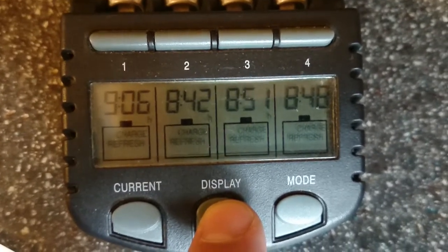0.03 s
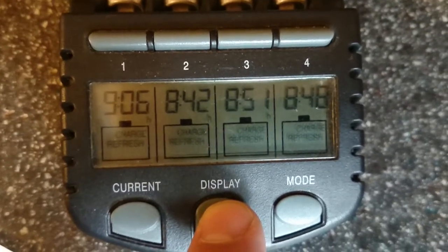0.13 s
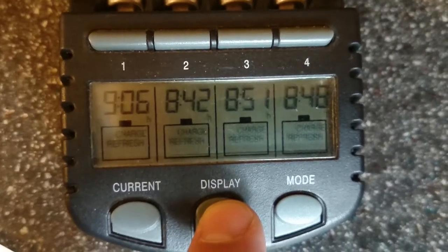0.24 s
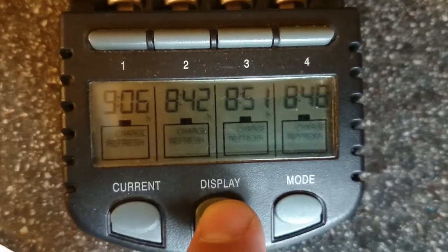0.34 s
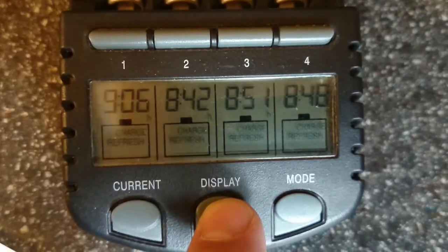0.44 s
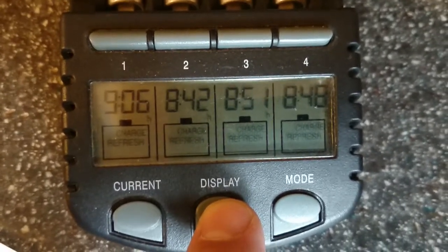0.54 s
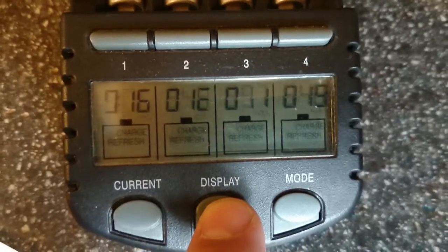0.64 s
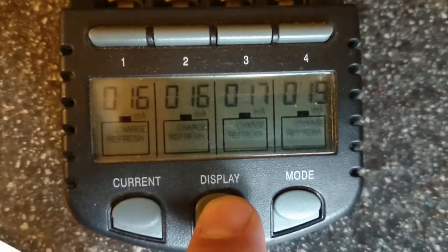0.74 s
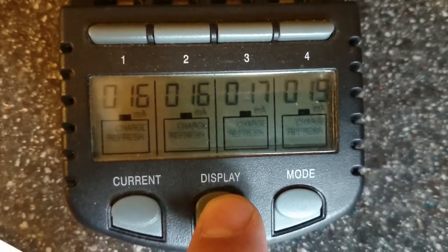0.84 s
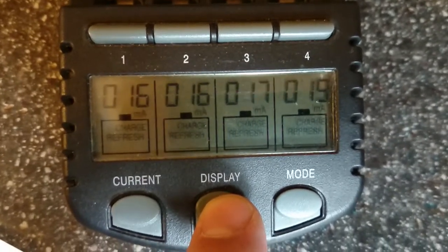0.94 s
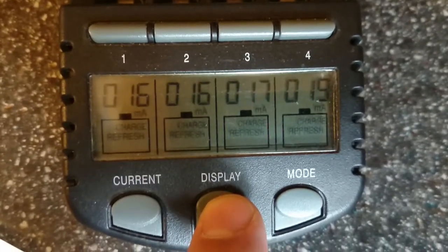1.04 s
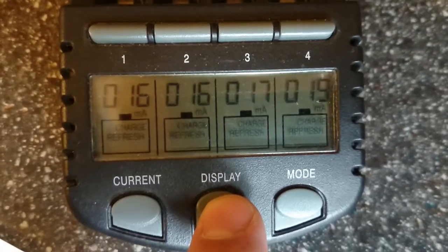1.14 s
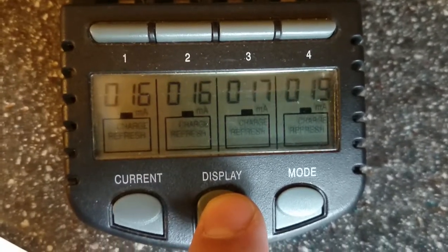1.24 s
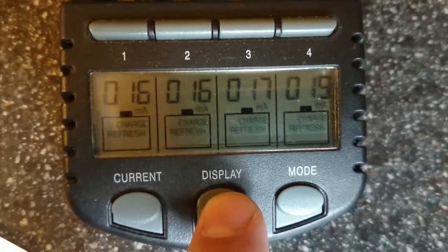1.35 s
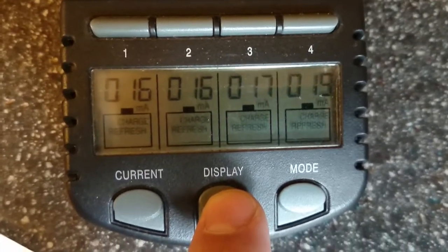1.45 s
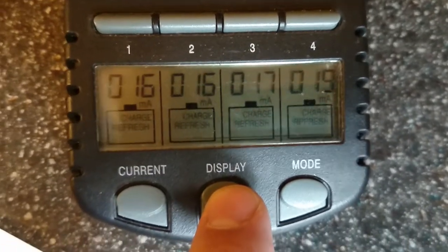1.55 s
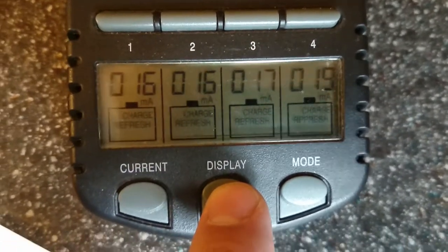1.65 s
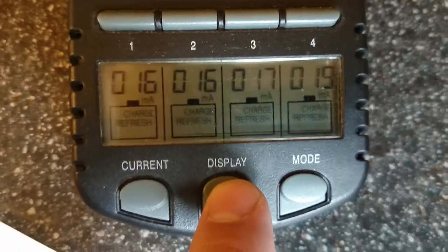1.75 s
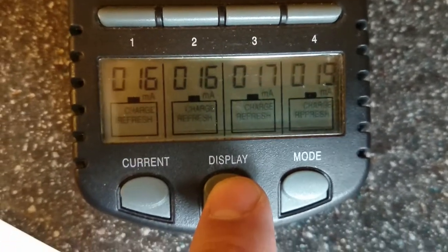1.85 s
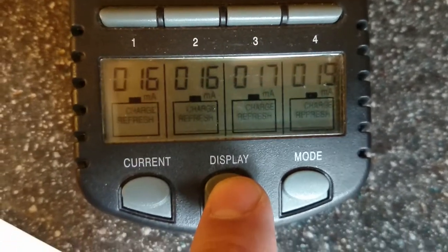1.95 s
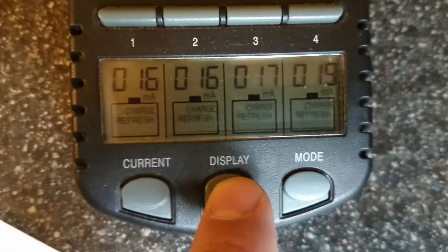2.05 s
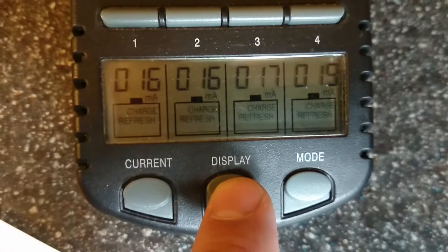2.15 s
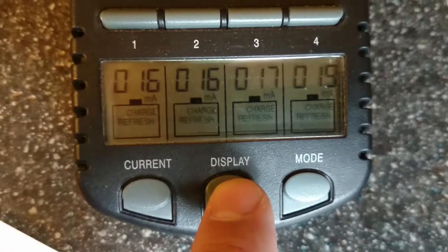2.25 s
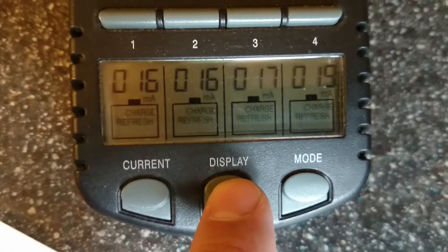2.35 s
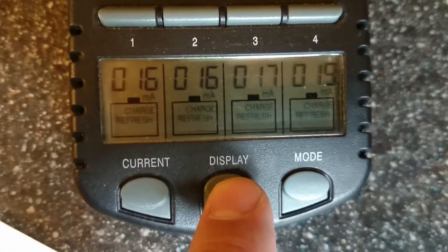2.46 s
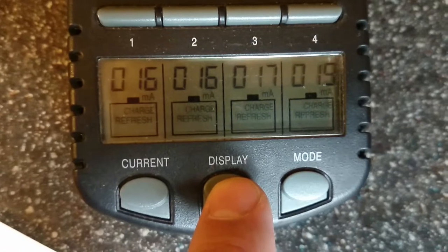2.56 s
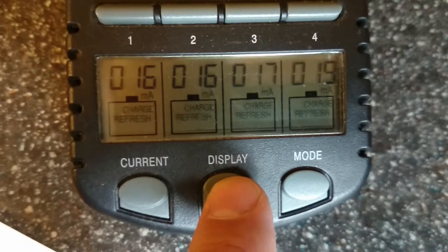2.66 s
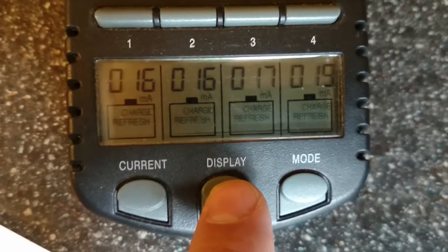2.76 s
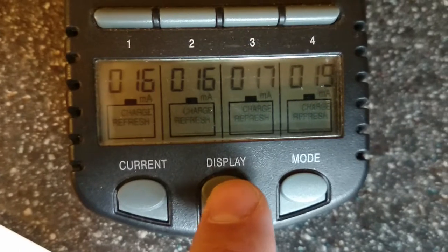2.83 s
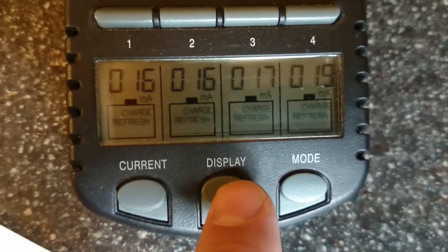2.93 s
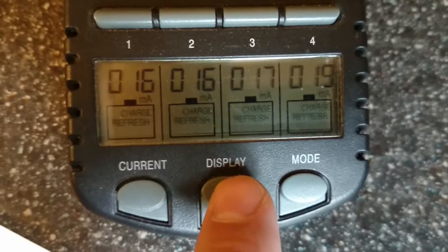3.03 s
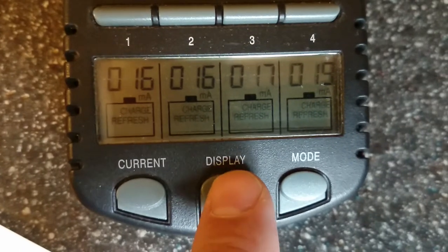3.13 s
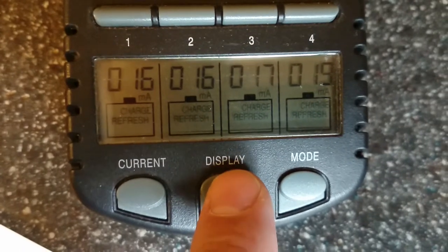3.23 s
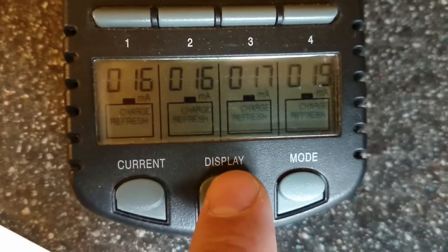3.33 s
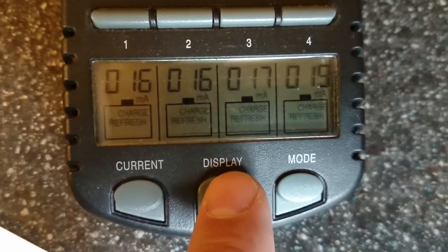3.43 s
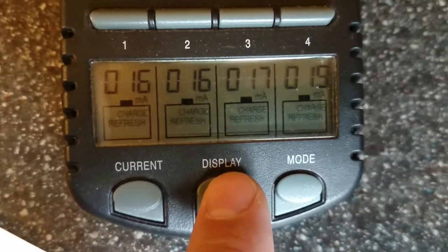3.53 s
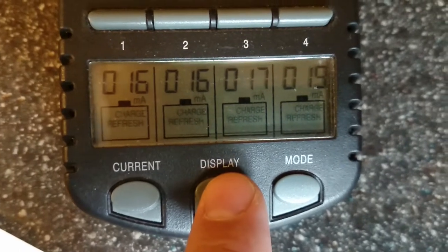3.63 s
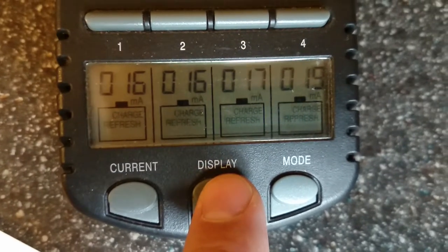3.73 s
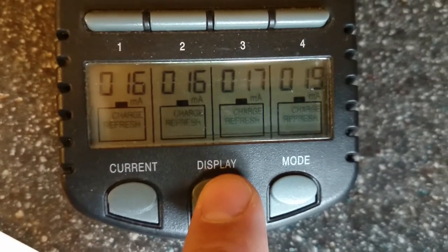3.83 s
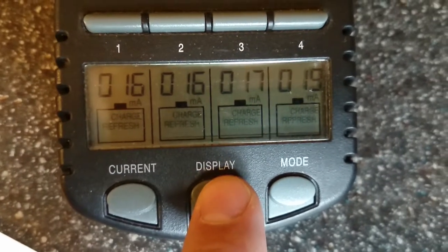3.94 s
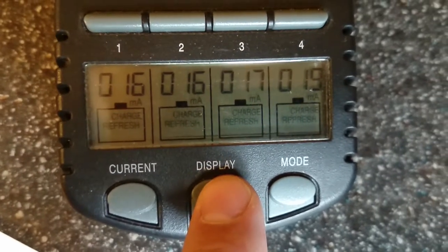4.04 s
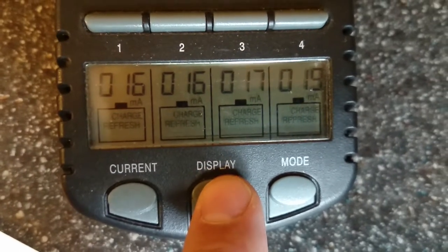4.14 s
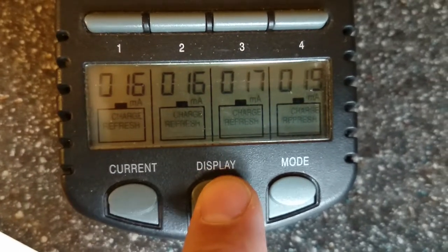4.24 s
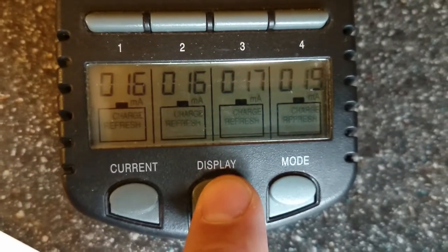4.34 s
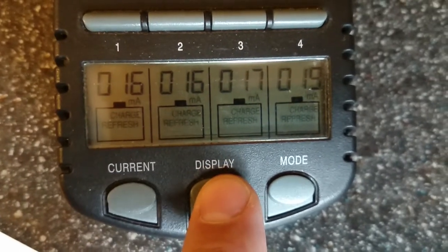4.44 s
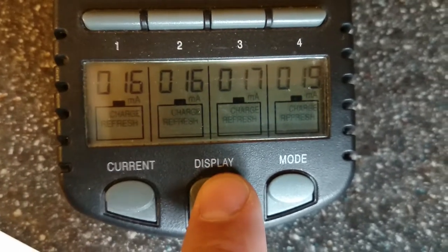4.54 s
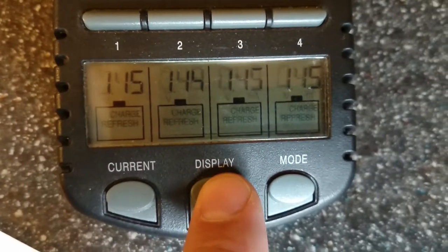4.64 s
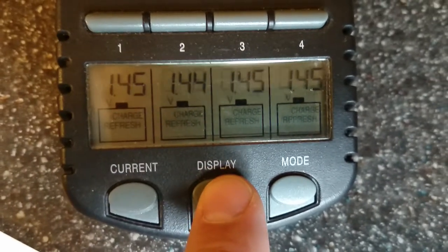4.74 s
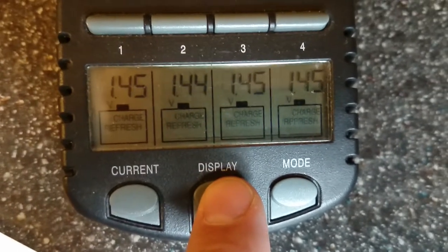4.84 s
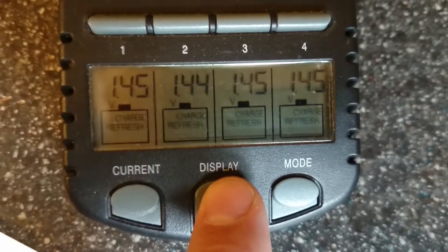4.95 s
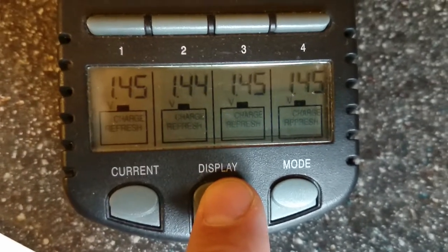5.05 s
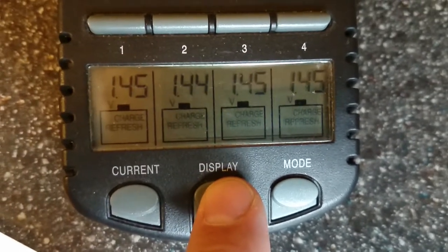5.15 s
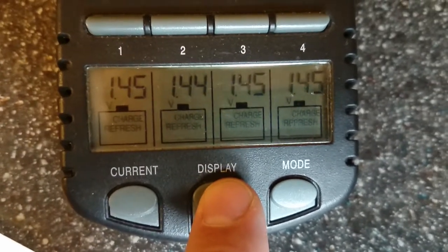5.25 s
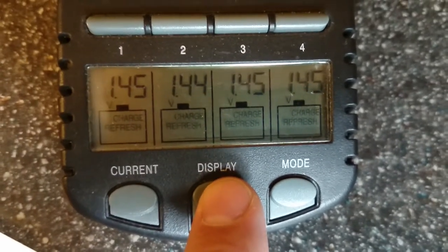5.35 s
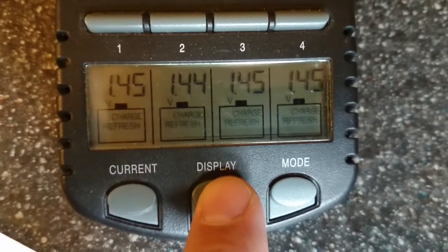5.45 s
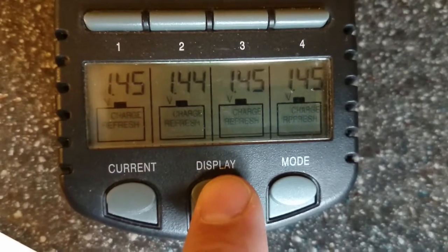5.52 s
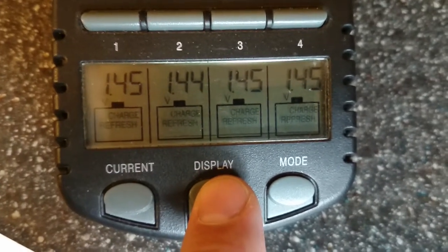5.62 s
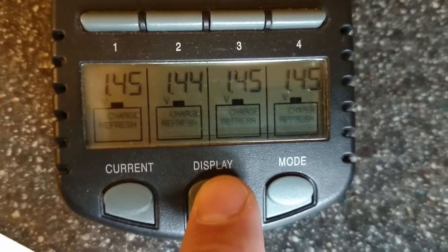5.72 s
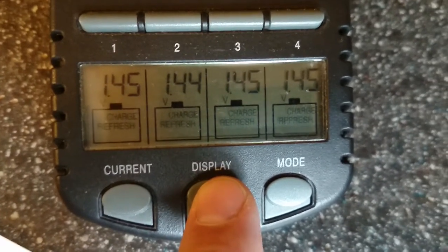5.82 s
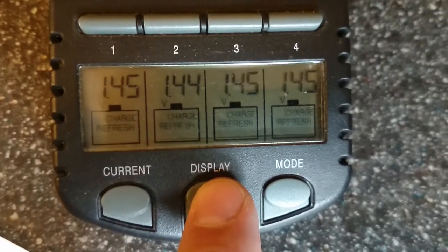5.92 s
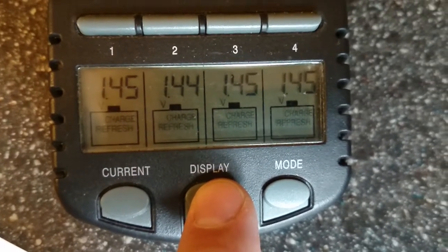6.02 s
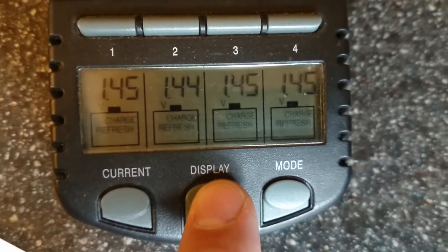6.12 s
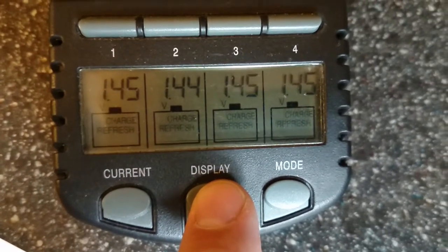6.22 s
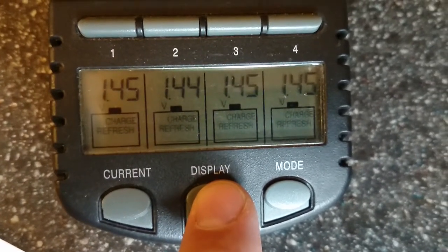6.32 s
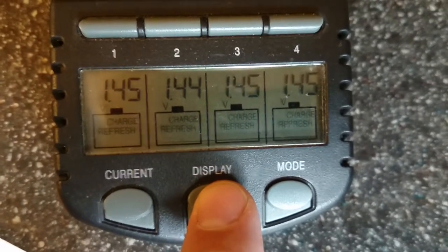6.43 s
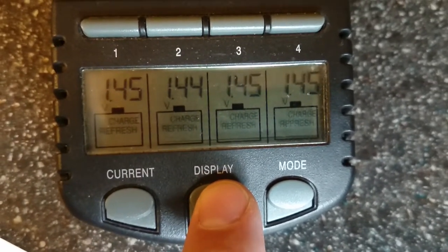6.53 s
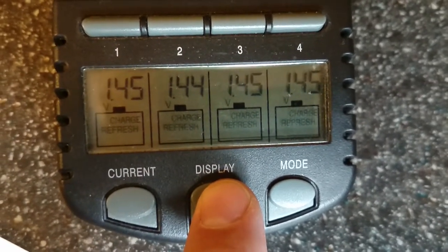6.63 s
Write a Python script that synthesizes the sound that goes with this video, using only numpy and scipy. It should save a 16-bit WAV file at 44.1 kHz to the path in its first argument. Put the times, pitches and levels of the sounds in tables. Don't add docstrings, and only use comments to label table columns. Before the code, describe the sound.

Close to a microphone in a small room, a plastic button on a device on a hard table is pressed and released with two sharp, chattering clicks, then faint finger shifts follow. Later a second press and release snap. Soft hiss and faint regular electric ticking run beneath, while a low draught rumbles and pops in the right channel only.

```python
import sys
import numpy as np
from scipy import signal
from scipy.fft import rfft, irfft
from scipy.io import wavfile
from scipy.ndimage import uniform_filter1d

SR = 44100
rng = np.random.default_rng(int(sys.argv[2]) if len(sys.argv) > 2 else 0)


def inscribe(sig):
    pcm = np.round(np.clip(np.atleast_2d(sig).T, -1, 1) * 32767)
    wavfile.write(sys.argv[1], SR, pcm.astype(np.int16))


def level_to_linear(level):
    exponent = np.asarray(level, float) / 20
    return 10 ** exponent


N = 294567
RIGHT_LATE_S = 0.00027


def read(points, hz):
    f, value = np.transpose(points)
    return np.interp(np.log(hz + 1), np.log(f + 1), value)


def evened(x):
    return x / np.sqrt(np.mean(x ** 2) + 1e-20)


def add(mix, s, sound):
    part = mix[:, round(s * SR):][:, :sound.shape[1]]
    part += sound[:, :part.shape[1]]


def coloured(points):
    hz = np.fft.rfftfreq(N, 1 / SR)
    white = rfft(rng.standard_normal(N))
    return irfft(white * level_to_linear(read(points, hz)) * np.sqrt(SR / 2), N)


def ring(mode, rise_s=0.00023):
    hz, left_db, right_db, t60 = mode
    t = np.maximum(np.arange(SR // 5) / SR - np.array([[0], [RIGHT_LATE_S]]), 0)
    fading = level_to_linear(np.array([[left_db], [right_db]]) - 60 * t / t60)
    return fading * np.sin(2 * np.pi * hz * t) * (1 - np.exp(-t / rise_s))


def thinned(hiss):
    line_db, patch_db, from_hz, lift_db = -3, -4.5, 2500, 0.98
    hz, _, z = signal.stft(hiss, SR, nperseg=2048)
    power = abs(z) ** 2
    around = uniform_filter1d(power.mean(2, keepdims=True), size=41, axis=1)
    strong_line = power > level_to_linear(2 * line_db) * around
    strong_patch = uniform_filter1d(power, size=9, axis=1) > level_to_linear(2 * patch_db) * around
    gain = np.where(hz[:, None] > from_hz, level_to_linear(lift_db) * (strong_line & strong_patch), 1)
    return signal.istft(z * gain, SR, nperseg=2048)[1][:, :N]


# [f/Hz, level/dB per Hz]
LEFT_HISS = [(15, -87), (60, -86.5), (100, -90.5), (300, -96.5), (800, -105), (1500, -111), (4500, -116),
             (6500, -117), (7900, -107), (9700, -118), (10500, -114), (12000, -119), (14000, -122),
             (15600, -120)]
RIGHT_HISS = [(15, -82.5), (100, -85.5), (400, -99), (800, -105), (1500, -109), (3000, -110), (4500, -113),
              (5650, -107), (6600, -115), (8000, -118), (11000, -120), (16000, -120)]


def port_hiss():
    return thinned(np.array([coloured(LEFT_HISS), coloured(RIGHT_HISS)]))


# [f/Hz, left level/dB, right level/dB]
HUM = [(792.5, -97, -88.5), (6600, -100, -99), (7130, -99, -99), (5900, -103, -87), (5730, -103, -103),
       (5300, -103, -114)]
# [first tick t/s, number of ticks]
TICK_RUNS = [
    (.2061, 25),
    (.7080, 1),
    (.7419, 23),
]
# [f/Hz, left level/dB, right level/dB, 60 dB decay t/s]
COIL = [(3620, -61, -69, 0.004), (5400, -60, -96, 0.0041), (7790, -60.5, -90, 0.0047),
        (8480, -56.5, -82, 0.0043), (10530, -66, -81, 0.01), (12300, -63.5, -90, 0.004)]


def coil():
    gap_s, cycle_s = .019522, .9991
    runs = [s + gap_s * np.arange(count) + cycle_s * k for s, count in TICK_RUNS for k in range(-1, 7)]
    at = np.concatenate(runs)
    at = at[(at > 0) & (at < (N - 1) / SR)]
    strength = level_to_linear(0.7 * rng.standard_normal(len(at)))
    train = np.bincount(np.round(at * SR).astype(int), strength, N)
    tick = sum(ring(mode) for mode in COIL)
    ticks = signal.oaconvolve(train[None], tick, axes=1)[:, :N]
    t = np.arange(N) / SR
    tones = 0
    for hz, left_db, right_db in HUM:
        tones = tones + level_to_linear(np.array([[left_db], [right_db]])) * np.sqrt(2) * np.sin(2 * np.pi * hz * t)
    return ticks + tones


# [t/s, level/dB]
DRAUGHT = [(0.0, -44.5), (0.6, -46), (1.05, -49), (1.4, -42.5), (1.9, -45.5), (2.4, -45), (2.95, -43.5),
           (3.45, -44.5), (3.8, -49), (4.02, -56), (4.12, -43), (4.6, -45.5), (4.7, -52), (4.9, -44.5),
           (5.55, -44), (5.8, -46), (6.15, -46), (6.68, -47)]
# [f/Hz, level/dB per Hz]
RUMBLE = [(1, -16), (5, 3.5), (12, 3.5), (22, -3), (32, -6.5), (50, -10), (80, -29.5), (300, -120)]
FLUTTER = [(10, -49), (25, -4), (45, -3.5), (70, -4), (110, -12.5), (200, -26.5), (400, -33.5), (800, -58),
           (2500, -100)]
# [t/s, peak level/dB, push +1 or pull -1]
EDDIES = [(.157, -36, 1), (0.249, -33, -1.05), (0.492, -31, 0.74), (0.551, -28.5, -1.06),
          (0.636, -33.5, 0.88), (0.934, -32, 0.9), (1.315, -31, -0.87), (1.42, -28.5, -1),
          (1.501, -31, 0.72), (2.15, -30.5, -1), (2.38, -29.5, 1), (2.44, -30, -1.1), (2.632, -30, 1),
          (2.88, -31, -1), (2.911, -31, 0.84), (3.002, -29.5, -1.15), (3.356, -30, -1.1), (4.099, -28, -1),
          (4.187, -29.5, 0.88), (4.489, -28.5, 1), (4.575, -28, 0.92), (4.85, -34, -1.03),
          (5.37, -31.5, 0.97), (5.494, -27, 1), (5.57, -26.5, 1), (5.891, -35, -1.2), (6.067, -30.5, -1.2),
          (6.15, -30, 0.85), (6.514, -33, -1)]


def draught():
    rumble_db, flutter_db, flutter_follows = 6, -55, 0.64
    eddy_s, recoil = .011, 0.83
    t = np.arange(N) / SR
    flow_db = np.interp(t, *np.transpose(DRAUGHT))
    gusts = evened(uniform_filter1d(uniform_filter1d(rng.standard_normal(N), 1500), 1500))
    rumble = level_to_linear(flow_db + rumble_db) * evened(coloured(RUMBLE))
    strength_db = flutter_db + flutter_follows * (flow_db + 45.5) + 3.88 * gusts
    flutter = level_to_linear(strength_db) * evened(coloured(FLUTTER))
    eddies = 0
    for s, peak_db, sign in EDDIES:
        spread = ((t - s) / eddy_s) ** 2
        eddies = eddies + sign * level_to_linear(peak_db) * (1 - recoil * spread) * np.exp(-spread / 2)
    return np.array([[0], [1]]) * (rumble + flutter + eddies)


# (f/Hz, level/dB, 60 dB decay t/s)
PORT_RING = (400, -36, .018)


def pop(peak_db, sign, first_hz, last_hz, t60):
    crest_s = 0.0019
    lead = SR // 50
    t = np.arange(-lead, SR // 5) / SR
    after = np.maximum(t, 0)
    hz = last_hz + (first_hz - last_hz) * np.exp(-(after / 0.0028) ** 0.55)
    turns = np.cumsum(hz) / SR
    turns = turns - turns[lead]
    fading = np.hypot(after, crest_s) - crest_s
    outline = np.where(t < 0, np.exp(-(t * first_hz / 0.38) ** 2), level_to_linear(-60 * fading / t60))
    swing = np.cos(2 * np.pi * turns) * outline
    ring_hz, ring_db, ring_t60 = PORT_RING
    ripple = level_to_linear(ring_db - 60 * after / ring_t60) * np.sin(2 * np.pi * ring_hz * after)
    ripple = ripple * (1 - np.exp(-(after / 0.00089) ** 2))
    return np.array([[.004], [1]]) * sign * level_to_linear(peak_db) * (swing + ripple)


# [t/s, peak level/dB, push +1 or pull -1, first f/Hz, 60 dB decay t/s]
POPS = [(0.2668, -35.5, 0.967, 120, 0.018), (0.4915, -14.5, 0.81, 130, 0.011),
        (0.7985, -34, 0.94, 110, 0.026), (1.855, -34.5, -0.96, 122, 0.11),
        (3.082, -18.5, -1.04, 197, 0.025), (4.4861, -9, 0.87, 156, 0.016), (4.756, -33, 1, 89, 0.094),
        (4.994, -39, 1, 77.3, 0.069), (5.4881, -21.5, -1.1, 198, 0.028), (5.578, -21, -1, 166, 0.017),
        (5.973, -42, -1, 224, 0.015), (5.985, -40, 1, 180, 0.14), (6.176, -37.5, -0.98, 205, 0.03),
        (6.381, -34.5, 0.91, 102, 0.098)]
# [t/s, peak level/dB, push +1 or pull -1, f/Hz, 60 dB decay t/s]
WOBBLES = [
    (2.76, -31, 0.87, 96, 0.046),
    (3.0875, -15, 0.83, 81, 0.081),
    (4.4875, -36.5, -0.61, 640, 0.0221),
    (5.4931, -17.5, 0.82, 80, 0.12),
    (5.5833, -22.5, 0.96, 79, 0.09),
]


def port_pops():
    mix = np.zeros((2, N))
    for events, sag in [(POPS, 0.4), (WOBBLES, 0.95)]:
        for s, peak_db, sign, hz, t60 in events:
            add(mix, s - .02, pop(peak_db, sign, hz, sag * hz, t60))
    return mix


# [f/Hz, level/dB]
WALLS = [(150, -3.5), (600, 9), (1100, 1.5), (1600, 1.5), (1930, -2), (2300, 1), (3500, -0.5), (5500, -1),
         (7000, -8.5), (13000, -13)]
# [f/Hz, 60 dB decay t/s]
ROOM = [(150, 0.33), (700, 0.39), (2000, 0.8), (5000, 0.58), (12000, 0.84)]


def room(x):
    builds_s = 0.014
    taps = np.zeros((2, SR // 2))
    at = np.arange(300, SR // 2 - 20, 20)
    at = at + rng.integers(0, 20, (2, len(at)))
    np.put_along_axis(taps, at, rng.choice([-1., 1.], at.shape), 1)
    hz, t, z = signal.stft(taps, SR, nperseg=256)
    fading = level_to_linear(read(WALLS, hz)[:, None] - 60 * t / read(ROOM, hz)[:, None])
    tail = signal.istft(z * fading * (1 - np.exp(-t / builds_s)), SR, nperseg=256)[1]
    return signal.fftconvolve(x, tail / np.linalg.norm(tail[0]), axes=1)[:, :N]


# [f/Hz, left level/dB, right level/dB, 60 dB decay t/s]
CASE = [(392, -3.5, -9.5, 0.038), (592, 2, 3.5, 0.065), (818, -8, -6, 0.032), (1113, -5, -2, 0.0285),
        (1300, -1.5, 2.5, 0.034), (1730, -1, 3.5, 0.017), (2565, -25.5, -3.5, 0.02),
        (3606, 7, -4.5, 0.0058), (4900, 3, -16, 0.0077), (5510, -29, -4, 0.024), (5794, -4, -9.5, 0.046),
        (7730, 0.5, -39, 0.009), (8260, -1.5, -31, 0.0069), (12280, 3, -27, 0.0038)]
LID = (1927, -4.5, 7.5, 0.0276)
TABLE = [(120, -14.5, -18, 0.26), (170.4, -5.5, -2, 0.097), (204.5, -3.5, -16.5, 0.061),
         (283, -15.5, -6.5, 0.066)]
# [f/Hz, level/dB]
LEFT_CRACK = [(200, 0), (1000, -13), (4000, -7), (6300, -5), (8200, 4.5), (10000, -2.5), (13000, -5),
              (16000, -34.5)]
RIGHT_CRACK = [(200, 15), (1000, 2), (4000, -10.5), (5600, -3.5), (7000, -3), (10000, -15), (13000, -17),
               (16000, -10)]


def click(blow_db, rattle_s, lid_db, bright_db, thud_db, lid_hz=LID[0], accents=(), count=12):
    last_bounce, spread = 1.9, 1.5
    place = last_bounce * np.linspace(0, 1, count) ** spread + .05 * rng.standard_normal(count)
    size = rng.standard_normal((len(CASE) + 3, count))
    at = np.round(np.clip(place, 0, 3) * rattle_s * SR).astype(int)
    swell = level_to_linear(6.0 - 18.6 * np.hypot(place - .4, .25))

    gains_db = [bright_db * np.log2(mode[0] / 585) / 2 for mode in CASE] + [lid_db, 0, 0]
    modes = CASE + [(lid_hz, *LID[1:]), *accents]
    rings = 0
    for mode, push, gain_db in zip(modes, size, gains_db):
        blows = np.bincount(at, (np.sign(push) * 0.58 + 0.27 * push) * swell)
        wave = np.exp(2j * np.pi * mode[0] * np.arange(len(blows)) / SR)
        woken = abs(blows @ wave) / np.linalg.norm(blows)
        blows = blows / np.maximum(woken, .5)
        rings = rings + level_to_linear(gain_db - 11.5) * signal.fftconvolve(ring(mode), blows[None])[:, :SR // 5]

    t, hz = np.arange(SR // 5) / SR, np.fft.rfftfreq(SR // 5, 1 / SR)
    blows = np.bincount(at, swell ** 1.1 * level_to_linear(4.5 * np.clip(size[-1], -2, 1)))
    bursts = signal.oaconvolve(blows, level_to_linear(-60 * t / 0.0048))[:len(t)]
    bursts = np.array([bursts, np.roll(bursts, round(RIGHT_LATE_S * SR))])
    bursts = bursts * rng.standard_normal((2, len(t)))
    colour_db = np.array([read(LEFT_CRACK, hz), read(RIGHT_CRACK, hz)])
    colour_db = colour_db + bright_db * np.log2(hz / 585 + 1) / 2
    crack = level_to_linear(-4.5) * irfft(rfft(bursts) * level_to_linear(colour_db), len(t)) * (t < .1)

    thud = level_to_linear(thud_db) * sum(ring(mode, 0.014) for mode in TABLE)
    to_phone = rings + crack + thud
    to_room = level_to_linear(-23) * rings + crack + thud
    return level_to_linear(blow_db) * np.vstack([to_phone, to_room])


# [t/s, blow level/dB, lid ring level/dB, brightness level/dB, table thud level/dB]
TOUCHES = [
    (2.749, -56, 4.5, -3, 24),
    (2.86, -64.5, 2, -3, 16),
    (3.4146, -49, -2, -7.5, 9.5),
    (3.4420, -55.5, -6.5, -4.5, 18.5),
    (2.984, -74, -7, -13, 21.5),
]
# (f/Hz, left level/dB, right level/dB, 60 dB decay t/s)
CAP = (1090, 2.3, 1.5, 0.062)


def finger_touches(button):
    for s, blow_db, *row in TOUCHES:
        add(button, s, click(blow_db, .0055, *row, 1790, [CAP]))


# [t/s, blow level/dB, rattle length t/s, lid ring level/dB, table thud level/dB]
CLICKS = [
    (0.647, -32, 0.0064, 9, 3.5),
    (0.9412, -36, .008, -4, 3.5),
    (4.3596, -31, 0.0072, -0.5, -3),
    (4.634, -34, .0105, 1, -4.5),
]
# [f/Hz, left level/dB, right level/dB, 60 dB decay t/s]
ACCENTS = [
    [(4810, 7, 2, 0.015), (3300, 10, -2, 0.0087)],
    [(6250, -7, 0, 0.016), (620, -14, -1, 0.028)],
    [(3650, -23, -4, 0.03), (6920, -3, -18.5, 0.0098)],
    [(1160, -4.5, -4, 0.044), (2720, -1, -9, 0.016)],
]


def button_clicks(button):
    for (s, blow_db, rattle_s, lid_db, thud_db), accents in zip(CLICKS, ACCENTS):
        add(button, s, click(blow_db, rattle_s, lid_db, 1.5, thud_db, accents=accents))


def scene():
    background = port_hiss() + coil() + draught() + port_pops()
    button = np.zeros((4, N))
    finger_touches(button)
    button_clicks(button)
    return background + button[:2] + level_to_linear(-10.5) * room(button[2:])


def band_limit(x):
    return signal.sosfilt(signal.butter(12, 16300, fs=SR, output="sos"), x)


def record(dry):
    edge = signal.firwin(1023, 15750, window=("kaiser", 8), fs=SR)
    mix = signal.oaconvolve(dry, edge[None], "same")
    return band_limit(mix)


dry = scene()
out = record(dry)
inscribe(out)
```